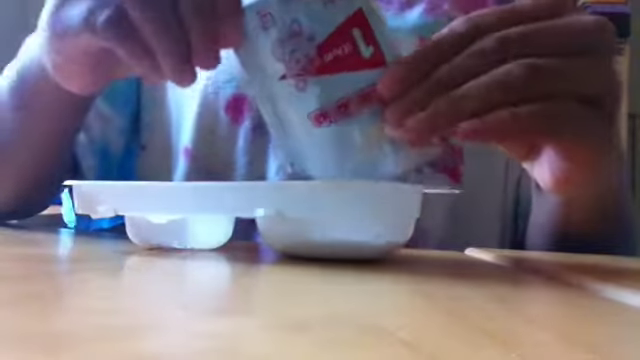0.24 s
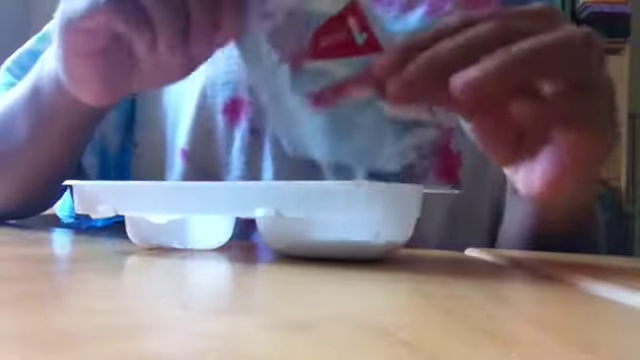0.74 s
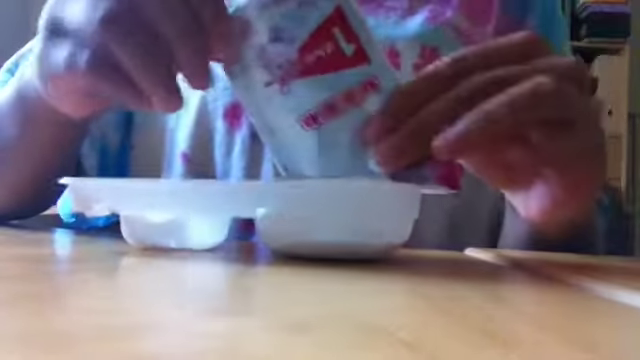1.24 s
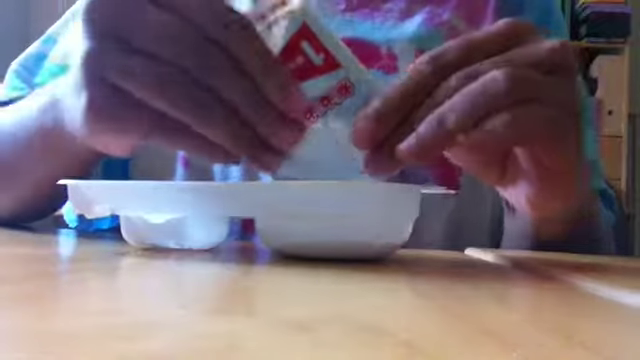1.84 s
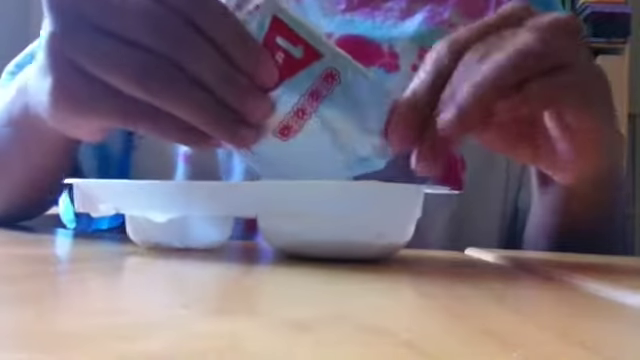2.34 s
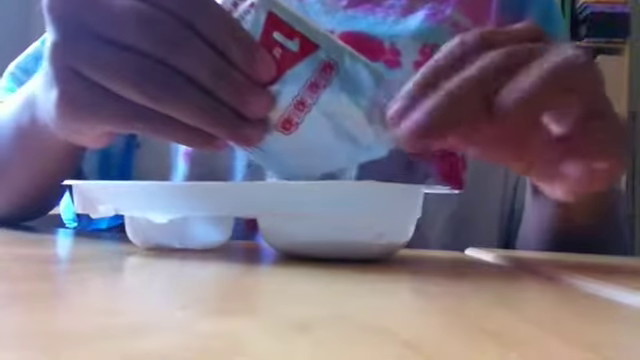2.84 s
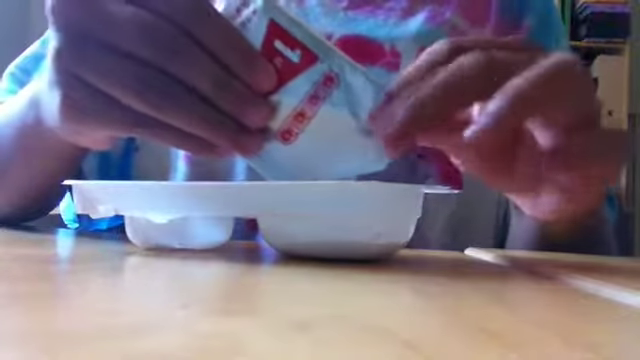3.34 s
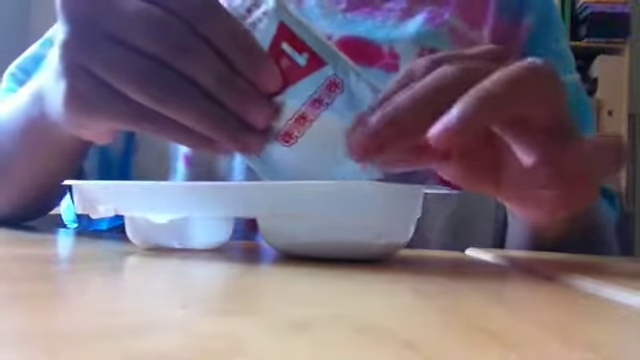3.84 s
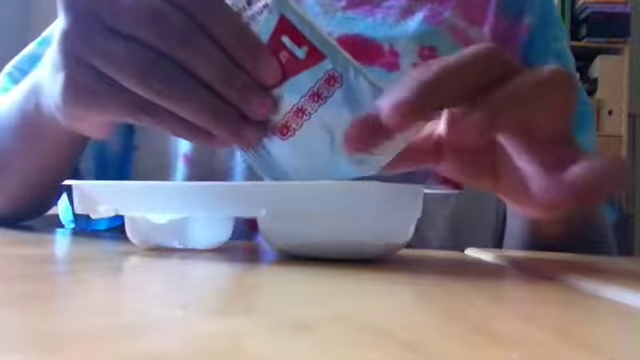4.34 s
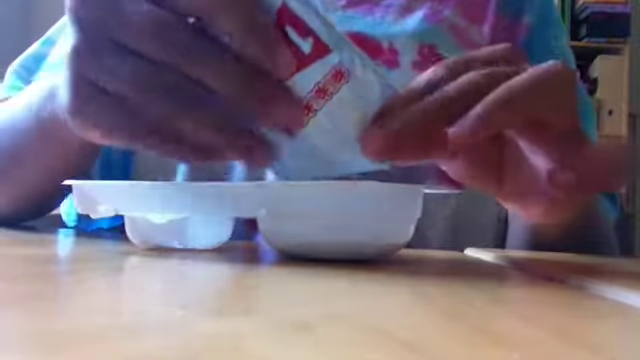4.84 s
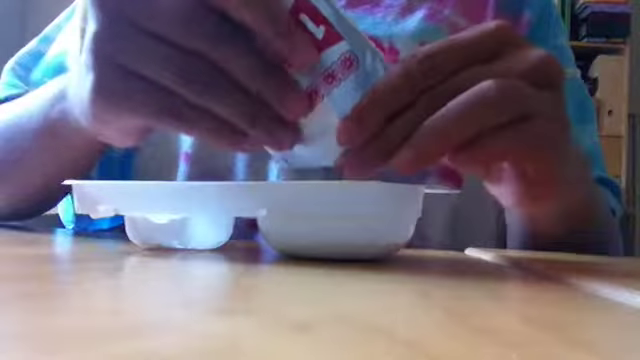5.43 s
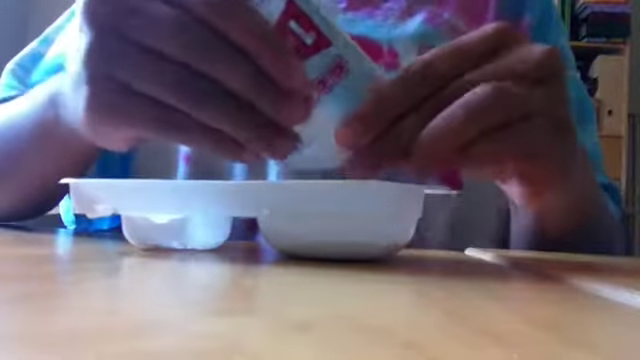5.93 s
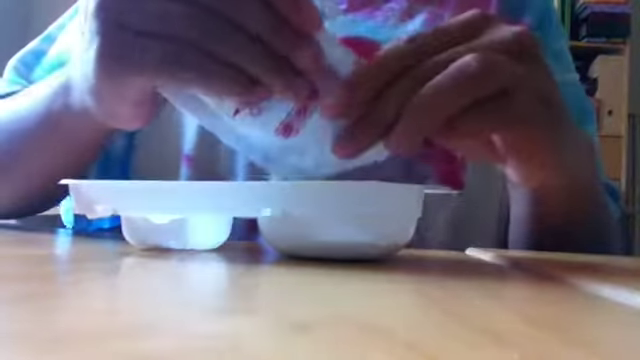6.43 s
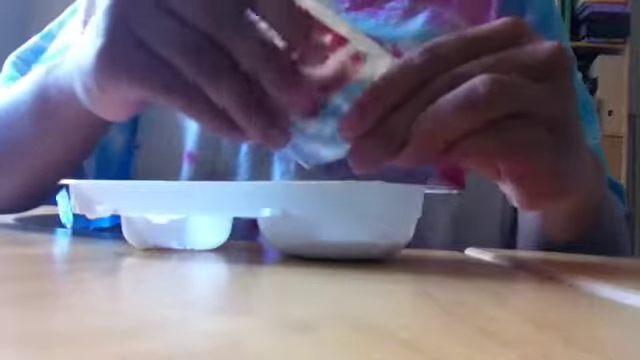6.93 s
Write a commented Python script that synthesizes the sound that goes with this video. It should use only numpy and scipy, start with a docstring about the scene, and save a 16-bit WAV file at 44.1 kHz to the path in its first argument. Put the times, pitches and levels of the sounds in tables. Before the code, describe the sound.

Close to a microphone on a table in a small, quiet room, hands work a plastic powder packet. Crisp snaps and crackles run throughout over a faint rustle, with soft hollow pops. A thin plastic tray clatters briefly near the start, loudest just after one second, and again at about two and a half. Later squeezes crackle harder, with strong snaps near five seconds and again past six and a half.

```python
"""A small room, with a microphone close by on a table: two hands squeeze and shake a plastic powder packet over a tray.
Big creases snap, each a noise burst coloured by its own ringing facet of film; the pouch pops with a clack and a thud.
Squeezes swell the hiss and ticks of rubbed film, powder slides in short gritty noise runs, fingertips bump softly.
The thin tray clatters as decaying, blurred modes with a buzzing rim. Short noise tails answer as the room, over
a quiet coloured-noise background."""
import sys
import numpy as np
from scipy import signal
from scipy.fft import rfft, irfft, next_fast_len
from scipy.io import wavfile
from scipy.ndimage import map_coordinates

SR = 44100
rng = np.random.default_rng(int(sys.argv[2]) if len(sys.argv) > 2 else 0)


def bounce(signal):
    """Save signal as a 16-bit WAV file at the path given by the first command-line argument."""
    frames = np.transpose(np.atleast_2d(signal))
    limited = np.clip(frames, -1, 1)
    pcm = np.round(limited * 32767).astype(np.int16)
    wavfile.write(sys.argv[1], SR, pcm)


N = 316638  # length in samples, about 7.2 s


def amp(db):
    """Decibels to gain."""
    return 10 ** (np.asarray(db) / 20)


def unit(x):
    """Scale to rms 1."""
    return x / np.sqrt(np.mean(x ** 2) + 1e-20)


def unit_attack(x):
    """Scale each row to rms 1 over its first five milliseconds."""
    attack_power = np.mean(x[..., :SR // 200] ** 2, axis=-1, keepdims=True)
    return x / np.sqrt(attack_power + 1e-20)


def along(points, hz):
    """Read (frequency, value) points on a log frequency axis."""
    point_hz, value = np.transpose(points)
    return np.interp(np.log(hz + 1), np.log(point_hz), value)


def filtered(x, response):
    """Multiply the spectrum of x by a response of frequency."""
    size = next_fast_len(N + SR // 2)
    hz = np.fft.rfftfreq(size, 1 / SR)
    return irfft(rfft(x, size) * response(hz), size)[:N]


def coloured(x, spectrum):
    """Shape x by a spectrum and scale it to rms 1."""
    return unit(filtered(x, lambda hz: amp(along(spectrum, hz))))


def wobble(rate):
    """A smooth random curve with rate knots a second."""
    knots = rng.standard_normal(int(N * rate / SR) + 4)
    return map_coordinates(knots, [np.arange(N) * rate / SR])


def bursts(count, snap_t60, ring_t60, ring_db, size=4096):
    """One noise row per blow: a sudden release, then a flutter with a strength and a pace of its own."""
    # the random pace stretches or squeezes both decays
    t = np.arange(size) / SR / np.exp(rng.normal(0, 0.82, (count, 1)))
    flutter_db = ring_db + rng.normal(0, 3.6, (count, 1))
    release = amp(-60 * t / snap_t60)
    flutter = amp(flutter_db - 60 * t / ring_t60)
    return rng.standard_normal((count, size)) * (release + flutter)


def facets(blows, spectrum, vary_db, count, size=8192, lift=np.zeros_like):
    """Colour each blow by the spectrum, bent by count random humps of its own and by lift(hz) in dB."""
    hz = np.fft.rfftfreq(size, 1 / SR)
    # humps sit evenly along the square root of frequency
    place = np.sqrt(np.minimum(hz / spectrum[-1][0], 1)) * (count - 1)
    heights = rng.uniform(-0.81, 1, (len(blows), count)) * np.sqrt(3)
    humps = np.array([np.interp(place, np.arange(count), row) for row in heights])
    # folding the cepstrum makes the filter minimum phase, so nothing sounds before the blow
    cepstrum = irfft(np.log(amp(along(spectrum, hz) + vary_db * humps + lift(hz))))
    cepstrum[:, 1:size // 2] *= 2
    cepstrum[:, size // 2 + 1:] = 0
    return unit_attack(irfft(rfft(blows, size) * np.exp(rfft(cepstrum))))


def placed(times, db, sounds):
    """Lay each sound at its time and level."""
    out = np.zeros(N + SR)
    for s, gain, sound in zip(times, amp(db), sounds):
        start = max(round(s * SR), 0)
        out[start:][:len(sound)] += gain * sound
    return out[:N]


# colour of the quiet place: pitch_hz [Hz], level_db [dB, relative]
QUIET_SPECTRUM = [(25, -39), (65, -16), (120, 3.5), (210, 4), (450, -0.5), (800, -5), (2000, -17),
                  (16000, -17.5)]


def quiet():
    """The steady background of the place is faint coloured noise."""
    return amp(-59) * coloured(rng.standard_normal(N), QUIET_SPECTRUM)


# decay of the room: pitch_hz [Hz], t60_s [s]
ROOM_DECAY = [(150, 0.24), (6000, 0.19), (15000, 0.26)]


def room(x, count=4):
    """Reflections build over a few milliseconds and die away; count different tails take turns, each 1/count s."""
    hz, t, noise = signal.stft(rng.standard_normal((count, SR // 2)), SR, nperseg=256)
    decay = amp(-60 * t / along(ROOM_DECAY, hz)[:, None])
    tails = signal.istft(noise * decay, SR, nperseg=256)[1]
    tail_s = np.arange(tails.shape[1]) / SR
    tails *= 1 - np.exp(-(tail_s / 0.0021) ** 2)
    tails /= np.linalg.norm(tails, axis=1, keepdims=True)
    turn = (np.arange(N) * count // SR) % count
    sends = x * (turn == np.arange(count)[:, None])
    return signal.fftconvolve(sends, tails, axes=1).sum(axis=0)[:N]


# squeezes of the packet: start_s [s], length_s [s], strength_db [dB, before RUB_DB]
SQUEEZE_TIMES = [(0.247, 0.079, -33), (0.63, 0.28, -40.5), (1.272, 0.11, -33.5), (1.477, 0.047, -33),
                 (1.705, 0.052, -26), (1.897, 0.072, -25.5), (2.296, 0.18, -28), (3.36, 0.095, -33.5),
                 (4.339, 0.058, -31), (4.638, 0.027, -30), (4.798, 0.052, -32), (4.973, 0.062, -21),
                 (5.164, 0.023, -27), (5.253, 0.09, -28), (5.68, 0.093, -36.5), (5.95, 0.15, -31),
                 (6.326, 0.16, -34.5), (6.587, 0.047, -32), (6.736, 0.081, -27.5), (6.94, 0.0088, -29),
                 (6.986, 0.024, -23.5), (7.087, 0.073, -28)]
SQUEEZE_ATTACK_S, SQUEEZE_RELEASE_S = 0.0077, 0.014  # time constants of the grip tightening and letting go
RUB_DB = -14  # rubbing relative to its squeeze
IDLE_RUB_DB = -59.5  # rubbing while the packet is only held


def rubbing(t):
    """How hard film and powder are rubbed at times t, in dB: each squeeze rises, holds and lets go."""
    start_s, length_s, strength_db = np.transpose(SQUEEZE_TIMES)[:, :, None]
    tightening = np.maximum(start_s - t, 0) / SQUEEZE_ATTACK_S
    letting_go = np.maximum(t - start_s - length_s, 0) / SQUEEZE_RELEASE_S
    grip = np.exp(-tightening - letting_go)
    squeeze_power = np.sum((grip * amp(strength_db + RUB_DB)) ** 2, axis=0)
    return 10 * np.log10(amp(IDLE_RUB_DB) ** 2 + squeeze_power)


# colour of rubbed film: pitch_hz [Hz], level_db [dB, relative]
RUSTLE_SPECTRUM = [(150, -33.5), (450, 6), (800, -2), (1400, 0.5), (4000, -4.5), (6300, -3.5),
                   (16000, -14.5)]


def rustle(count=420):
    """Rubbing sets off faint ticks all over the film, above the gritty hiss of powder sliding along it."""
    rub_s = np.arange(0, N / SR, .002)
    rub_db = rubbing(rub_s)
    chance = rng.random((count, 2))
    tick_s = chance[:, 0] * N / SR
    tick_db = np.interp(tick_s, rub_s, rub_db) - 2 + 11 * chance[:, 1] ** 2
    blows = bursts(count, snap_t60=0.001, ring_t60=0.02, ring_db=-11, size=1024)
    ticks = facets(blows, RUSTLE_SPECTRUM, vary_db=6, count=16, size=2048)
    # slow unevenness, and quick grit
    grit_db = 5.5 * wobble(900)
    hiss_db = np.interp(np.arange(N) / SR, rub_s, rub_db) - 10.5 + 3 * wobble(40) + grit_db
    hiss = amp(hiss_db) * coloured(rng.standard_normal(N), RUSTLE_SPECTRUM)
    return placed(tick_s, tick_db, ticks) + hiss


# powder sliding inside the packet: start_s [s], length_s [s], level_db [dB, scales the flow]
SLIDE_TIMES = [(0, 0.05, -40.5), (0.513, 0.035, -56), (0.72, 0.076, -46), (1.103, 0.029, -39),
               (2.229, 0.059, -45.5), (2.729, 0.012, -39), (6.12, 0.13, -47), (6.931, 0.021, -36.5)]
# colour of the powder: pitch_hz [Hz], level_db [dB, relative]
POWDER_SPECTRUM = [(200, -21), (1500, -1.5), (3500, 0), (6500, -2), (16000, -3)]


def powder():
    """Loose powder slides down the inside of the film in short, gritty runs."""
    start_s, length_s, level_db = np.transpose(SLIDE_TIMES)[:, :, None]
    progress = np.maximum(np.arange(N) / SR - start_s, 0) / length_s
    flow = np.sum(amp(level_db) * np.sqrt(progress) * np.exp(-progress ** 2), axis=0)
    grains = rng.standard_normal(N) * amp(5 * wobble(1500))
    return flow * coloured(grains, POWDER_SPECTRUM)


# fingers bumping the packet: start_s [s], level_db [dB, relative]
BUMP_TIMES = [(1.499, -33), (2.972, -39), (3.346, -39), (4.183, -43), (4.342, -41), (4.496, -40),
              (4.735, -40)]


def fingers():
    """A soft fingertip sets the whole packet swinging for a few cycles of a low, fast-fading sine."""
    start_s, level_db = np.transpose(BUMP_TIMES)
    t = np.arange(SR // 5) / SR
    pitch_hz = 172 * np.exp(rng.normal(0, 0.011, (len(start_s), 1)))
    envelope = amp(-60 * t / 0.058) * (1 - np.exp(-t / 0.0038))
    return placed(start_s, level_db + 3.5, np.sin(2 * np.pi * pitch_hz * t) * envelope)


# the tray tapping the table: start_s [s], level_db [dB, relative]
TAP_TIMES = [(0.12, -28), (0.144, -34), (0.162, -38), (1.192, -16.5), (1.2509, -24), (1.2938, -23),
             (1.322, -33), (2.415, -24.5), (2.4517, -30), (6.008, -29)]
# modes of the tray, before each tap varies them: pitch_hz [Hz], level_db [dB, relative], t60_s [s]
TRAY_MODES = [(323, -19, 0.2), (1437, -8, 0.14), (1745, 0, 0.045), (1950, 0, 0.07), (2055, -2, 0.115),
              (2115, -1, 0.07), (2220, 0, 0.05), (2730, -5, 0.09), (2850, 1, 0.05)]
# colour of the buzzing rim: pitch_hz [Hz], level_db [dB, relative]
RIM_SPECTRUM = [(70, -64), (300, -7), (900, -19), (2100, 3), (3200, -5), (11000, -11), (16000, -19)]


def tray():
    """Every tap rings the thin tray's modes at new strengths, while its rim buzzes against the table."""
    t = np.arange(SR // 3) / SR
    pitch_hz, mode_db, t60_s = np.transpose(TRAY_MODES)[:, :, None]
    start_s, level_db = np.transpose(TAP_TIMES)
    taps = len(start_s)
    vary_db, vary_phase, detune = np.moveaxis(rng.standard_normal((taps, 3, len(TRAY_MODES), 1)), 1, 0)
    # the rocking tray keeps changing its contact, which detunes the modes from tap to tap and blurs them
    drift = np.cumsum(.05 * rng.standard_normal((taps, len(TRAY_MODES), len(t))), axis=2)
    phase = 2 * np.pi * pitch_hz * (1 + .015 * detune) * t + np.pi * vary_phase + drift
    attack = 1 - np.exp(-t / .0006)
    modes = amp(mode_db + vary_db - 60 * t / t60_s) * np.sin(phase) * attack
    blows = bursts(taps, snap_t60=0.017, ring_t60=0.07, ring_db=-15)
    buzz = facets(blows, RIM_SPECTRUM, vary_db=2, count=40)
    return placed(start_s, level_db - 11.5, modes.sum(axis=1)) + placed(start_s, level_db - 5.5, buzz)


# the pouch buckling: start_s [s], thud_db [dB, before THUD_DB], clack_db [dB, before CLACK_DB]
POP_TIMES = [(0.086, -41, -36), (0.099, -36.5, -34.5), (0.221, -34, -38), (0.291, -37, -41),
             (0.402, -37, -38), (0.708, -37, -66), (1.334, -34.5, -33.5), (1.355, -30, -42),
             (1.502, -31.5, -49), (1.585, -35.5, -35.5), (1.602, -31.5, -41), (1.74, -32, -36),
             (1.766, -35.5, -34), (1.903, -34.5, -35.5), (2.343, -35, -35), (2.549, -33, -37),
             (2.615, -33, -37.5), (2.893, -31, -49), (2.905, -37.5, -37.5), (2.973, -30, -38.5),
             (3.098, -33, -38), (3.18, -35.5, -35.5), (3.301, -34, -49), (3.347, -35.5, -37.5),
             (3.468, -30.5, -34.5), (3.531, -37, -37), (3.606, -32.5, -38), (3.625, -36, -52),
             (3.698, -30, -36.5), (3.937, -34.5, -44.5), (4.185, -31, -54), (4.341, -31, -48),
             (4.421, -32, -41), (4.494, -27.5, -44), (4.679, -33, -37), (4.976, -34.5, -27),
             (5.378, -29, -38), (5.504, -35, -32.5), (5.545, -34, -34.5), (6.024, -36.5, -32.5),
             (6.614, -39, -42)]
# colour of the pouch wall: pitch_hz [Hz], level_db [dB, relative]
WALL_SPECTRUM = [(300, -30), (800, -17), (1000, -5.5), (1400, -3), (1750, -8.5), (2600, -14.5)]
# colour of the hollow inside: pitch_hz [Hz], level_db [dB, relative]
HOLLOW_SPECTRUM = [(55, -53), (100, -13.5), (165, -5), (280, -4.5), (430, 1.5), (530, -1), (660, -0.5),
                   (820, -19.5), (1600, -28)]
THUD_DB, CLACK_DB = -5, 0.5  # how well hollow and wall radiate


def pouch():
    """A wall of the pouch pops through with a clack; the air and powder inside answer with a dull thud."""
    start_s, thud_db, clack_db = np.transpose(POP_TIMES)
    count = len(start_s)
    wall_blows = bursts(count, snap_t60=0.0033, ring_t60=0.036, ring_db=0.0)
    clacks = facets(wall_blows, WALL_SPECTRUM, vary_db=0.0, count=14)
    hollow_blows = bursts(count, snap_t60=0.015, ring_t60=0.04, ring_db=-22)
    thuds = facets(hollow_blows, HOLLOW_SPECTRUM, vary_db=3.5, count=14)
    return placed(start_s, clack_db + CLACK_DB, clacks) + placed(start_s, thud_db + THUD_DB, thuds)


def aftershocks(count=4):
    """Smaller creases give way as the strain builds just before a snap or pop, and as it settles afterwards."""
    snaps = [(s, db - SNAP_CREST_DB) for s, db, _ in SNAP_TIMES]
    pops = [(s, db + CLACK_DB) for s, _, db in POP_TIMES]
    start_s, level_db = np.repeat(snaps + pops, count, axis=0).T
    chance = rng.random((len(start_s), 3))
    offset_s = .028 * chance[:, 0] - .007 * chance[:, 1]
    blows = bursts(len(start_s), snap_t60=0.00072, ring_t60=0.01, ring_db=-16.0, size=1024)
    slips = facets(blows, RUSTLE_SPECTRUM, vary_db=4.5, count=16, size=2048)
    return placed(start_s + offset_s, level_db - 23.0 + 8 * chance[:, 2], slips)


# colour of the cracking film: pitch_hz [Hz], level_db [dB, relative]
FILM_SPECTRUM = [(500, -16.5), (1500, 1.5), (2100, -5.5), (2500, 3), (3200, 0.5), (4500, -2.5), (5300, 2.5),
                 (6500, 1), (8000, -1), (12000, -2), (16000, -12.5)]
FACET_DB, FACET_OCTAVES = 9.5, 0.19  # height and width of the resonance of a facet


def cracks(start_s, level_db, ring_hz, flutter_db):
    """Each buckling crease cracks with the colour of its own facet of film, which rings broadly at ring_hz."""
    def resonance(hz):
        """Lift around the ring of each facet, in dB."""
        octaves = np.log2((hz + 1) / ring_hz[:, None])
        return FACET_DB * np.exp(-(octaves / FACET_OCTAVES) ** 2)

    releases = bursts(len(start_s), snap_t60=0.0025, ring_t60=0.018, ring_db=flutter_db)
    return placed(start_s, level_db, facets(releases, FILM_SPECTRUM, vary_db=3.5, count=26, lift=resonance))


# big creases snapping through: start_s [s], peak_db [dB, nominal], pitch_hz [Hz, ring of the facet]
SNAP_TIMES = [(0.102, -17, 5950), (0.212, -24.5, 4800), (0.221, -18, 9400), (0.292, -21, 3520),
              (0.403, -24.5, 9600), (0.517, -40.5, 2600), (0.62, -25.5, 5900), (0.668, -24.5, 3450),
              (0.709, -22.5, 8400), (0.77, -30, 5200), (0.797, -30.5, 1490), (0.839, -26.5, 3450),
              (0.891, -35, 3560), (1.001, -33, 4500), (1.277, -25, 5400), (1.289, -18, 4960),
              (1.357, -17, 3600), (1.44, -24, 6600), (1.503, -12, 5430), (1.521, -23.5, 5200),
              (1.531, -19.5, 5000), (1.705, -24, 6340), (1.718, -15.5, 1440), (1.757, -26, 2400),
              (1.794, -27, 1680), (1.809, -32.5, 1590), (1.911, -18, 5900), (1.929, -22, 2400),
              (1.934, -19, 2480), (1.942, -26, 3420), (1.965, -18.5, 1460), (1.972, -21, 6100),
              (2.059, -35, 2200), (2.095, -39, 2480), (2.158, -22, 4900), (2.168, -22, 2440),
              (2.183, -25.5, 2500), (2.304, -23, 5800), (2.318, -14, 11700), (2.326, -17, 5500),
              (2.373, -24, 2700), (2.439, -21, 2160), (2.536, -32, 2400), (2.57, -22.5, 2420),
              (2.594, -24, 9800), (2.773, -20.5, 3840), (2.811, -29, 6700), (2.855, -26.5, 6800),
              (2.997, -23, 10700), (3.099, -21.5, 6200), (3.112, -18, 11000), (3.182, -21, 6660),
              (3.189, -19.5, 6500), (3.198, -20, 1380), (3.278, -22.5, 6740), (3.301, -27, 1670),
              (3.409, -34, 1330), (3.437, -28.5, 5200), (3.472, -20, 1630), (3.506, -25.5, 5200),
              (3.533, -23.5, 1500), (3.537, -28, 3100), (3.7, -24, 6640), (3.744, -23, 5200),
              (3.78, -32, 1210), (3.851, -23, 1490), (4.064, -26.5, 7000), (4.187, -21.5, 10000),
              (4.263, -27.5, 2420), (4.344, -25.5, 2240), (4.355, -26, 7800), (4.496, -20, 1430),
              (4.509, -25, 1620), (4.57, -25, 7460), (4.678, -20, 5200), (4.74, -21.5, 6840),
              (4.76, -22, 5200), (4.803, -22, 8040), (4.817, -23.5, 7300), (4.828, -28, 7300),
              (4.907, -25.5, 5200), (4.92, -22, 2470), (4.977, -13.5, 2240), (4.986, -12, 12900),
              (5.015, -18, 3620), (5.058, -19.5, 12000), (5.165, -16, 7060), (5.171, -17.5, 5200),
              (5.19, -14, 7300), (5.245, -31, 6500), (5.336, -15.5, 4850), (5.372, -21.5, 12700),
              (5.432, -26.5, 2500), (5.502, -29, 5260), (5.564, -13.5, 8000), (5.675, -25, 6100),
              (5.686, -17, 8800), (5.751, -27.5, 2220), (5.822, -38.5, 5300), (5.846, -13.5, 1630),
              (5.851, -23.5, 5300), (5.909, -24, 1430), (5.965, -21, 3800), (5.977, -21, 2400),
              (5.984, -17, 3020), (6.057, -24, 2390), (6.082, -32, 3000), (6.147, -24, 3680),
              (6.16, -19.5, 3730), (6.207, -22, 2440), (6.34, -21, 1560), (6.358, -19, 5800),
              (6.377, -22, 1360), (6.412, -25, 5270), (6.429, -25.5, 4700), (6.471, -26.5, 5300),
              (6.519, -27.5, 5340), (6.561, -24.5, 5300), (6.581, -18.5, 5800), (6.599, -9.5, 6350),
              (6.631, -20.5, 6190), (6.756, -14, 3700), (6.759, -17.5, 2800), (6.783, -20, 3300),
              (6.819, -18.5, 9400), (6.993, -22, 4800), (7.034, -22.5, 2390), (7.147, -28.5, 1370)]
SNAP_CREST_DB = 12  # allowance for a snap's peak over the rms of its first five milliseconds
BODY_FOLLOWS = 0.4  # dB of shaking in the pouch for each dB of a crease


def creases():
    """A big crease snaps through, and shakes wall and hollow a little."""
    start_s, peak_db, ring_hz = np.transpose(SNAP_TIMES)
    level_db = peak_db - SNAP_CREST_DB
    # a taut crease lets go all at once; a slack one flutters
    flutter_db = -.35 * level_db[:, None] - 15.0
    shakes = bursts(len(start_s), snap_t60=0.0056, ring_t60=0.012, ring_db=-7.0)
    wall = facets(shakes, WALL_SPECTRUM, vary_db=8.5, count=12)
    hollow = facets(shakes, HOLLOW_SPECTRUM, vary_db=3.5, count=9)
    body = placed(start_s, BODY_FOLLOWS * level_db - 32.5, wall + hollow)
    return cracks(start_s, level_db, ring_hz, flutter_db) + body


def scene():
    """Packet and tray close by, their answer from the room, and the quiet background."""
    packet = creases() + pouch() + aftershocks() + rustle() + powder() + fingers()
    near = packet + tray()
    return (near + amp(-13) * room(near) + quiet())[None]


TOP_HZ = 16000  # upper band limit of the microphone


def record(dry, bass_hz=75):
    """The microphone rolls off the bass and keeps nothing from its band limit up."""
    def response(hz):
        """Gain of the microphone at each frequency."""
        return (hz < TOP_HZ) * hz ** 2 / (hz ** 2 + bass_hz ** 2)

    return filtered(dry[0], response)[None]


dry = scene()
out = record(dry)
bounce(out)
```